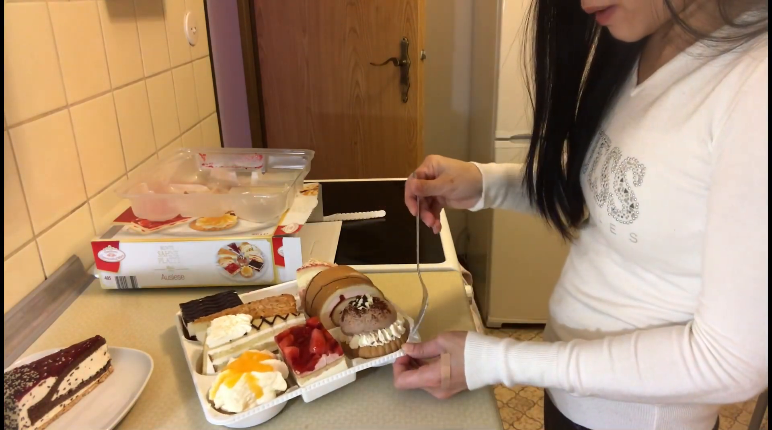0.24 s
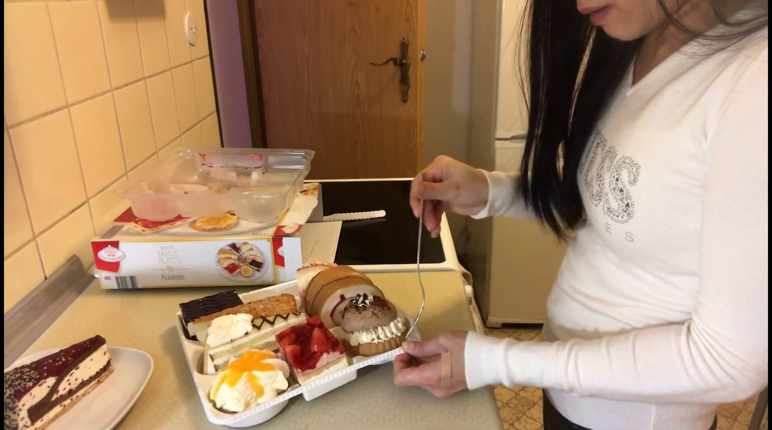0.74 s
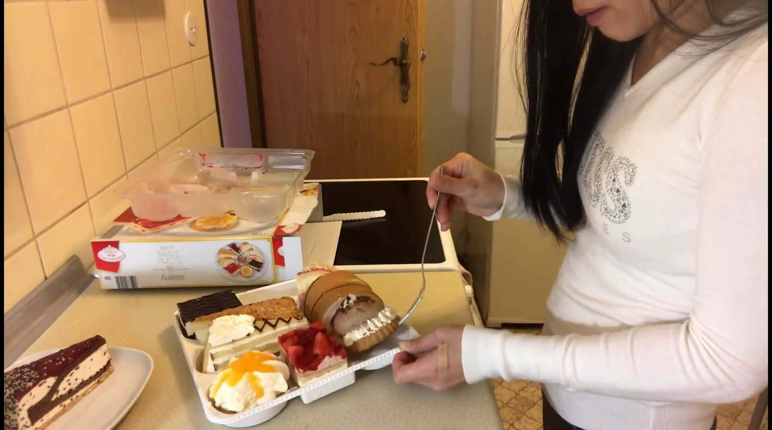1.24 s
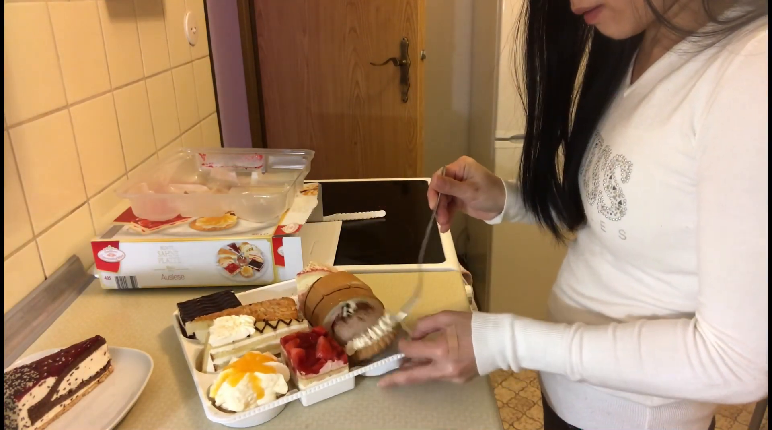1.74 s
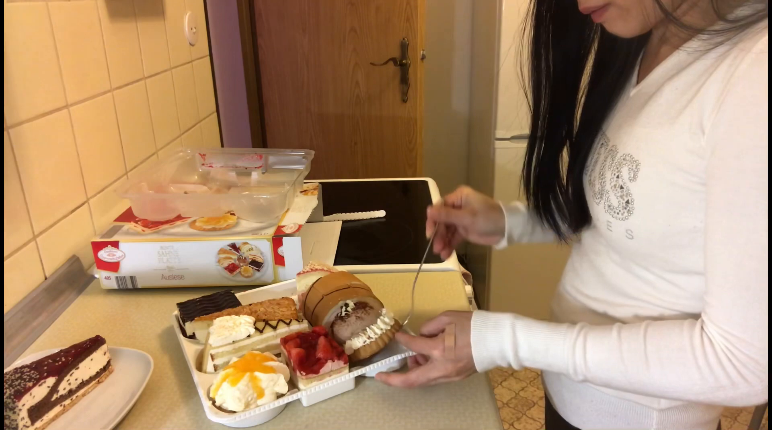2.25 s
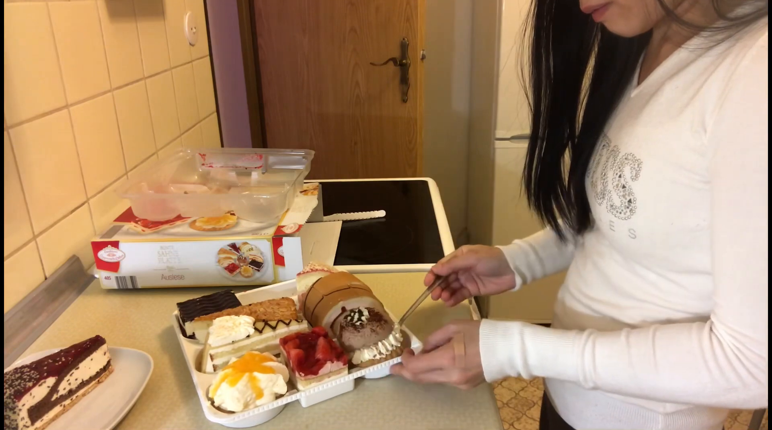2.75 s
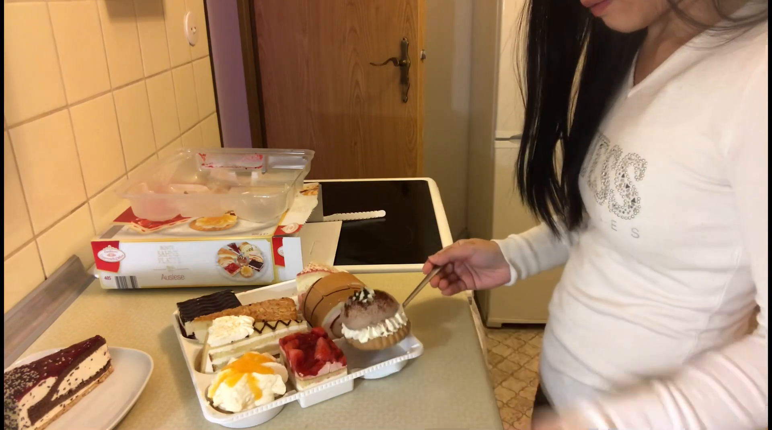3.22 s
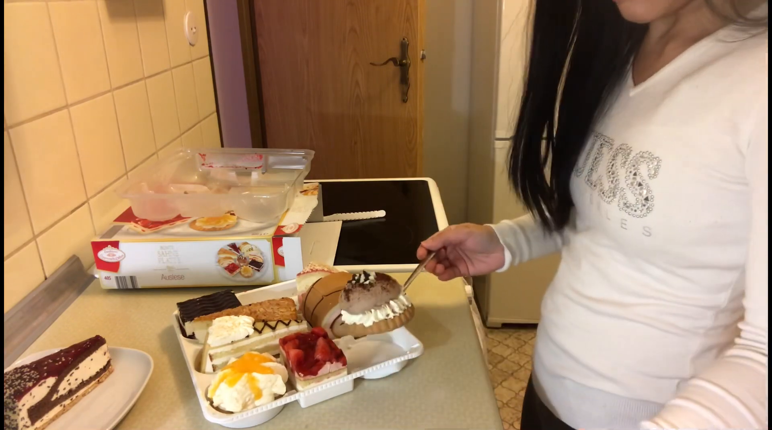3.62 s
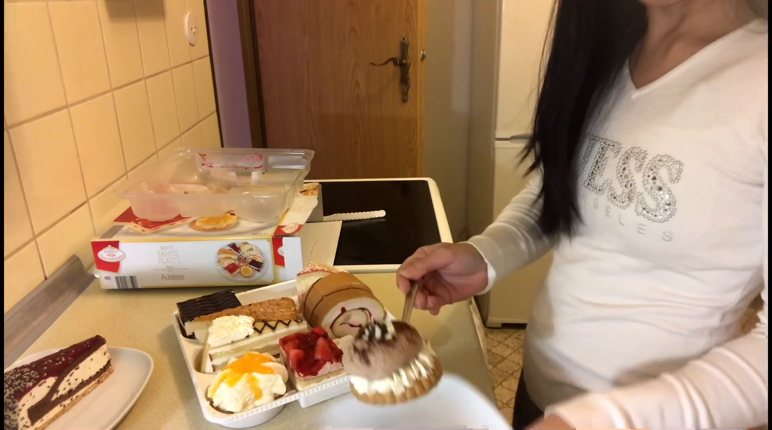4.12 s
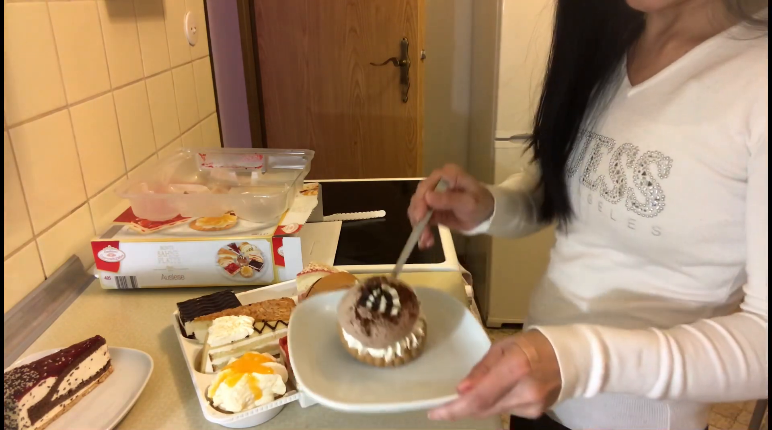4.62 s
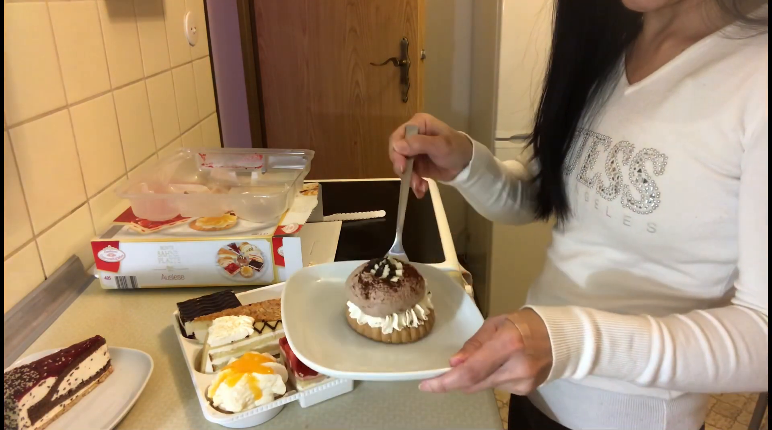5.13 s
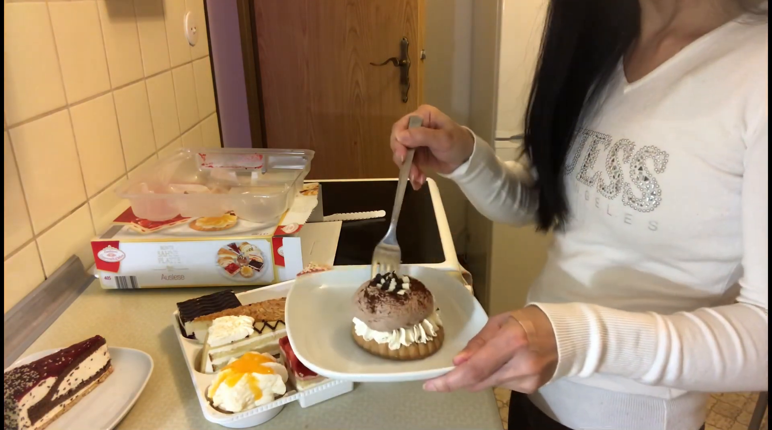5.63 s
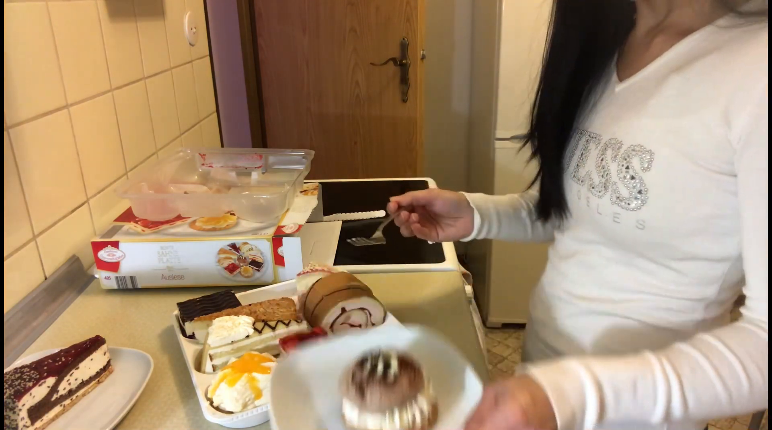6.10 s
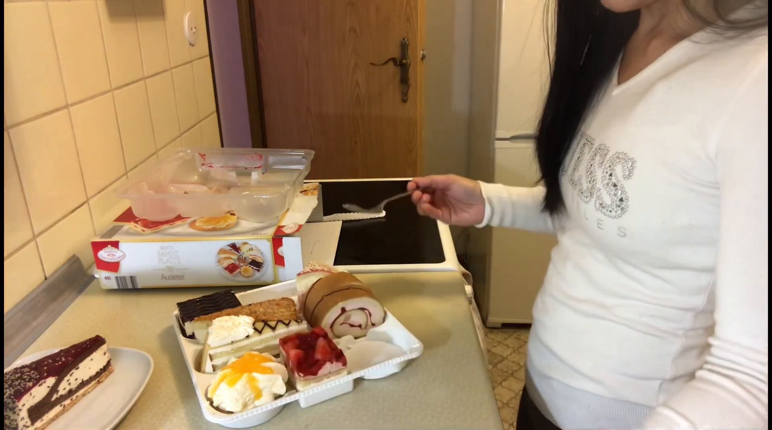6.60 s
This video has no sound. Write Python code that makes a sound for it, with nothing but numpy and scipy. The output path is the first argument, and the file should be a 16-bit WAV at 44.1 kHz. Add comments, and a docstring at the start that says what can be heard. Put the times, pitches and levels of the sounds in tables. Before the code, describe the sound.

A small tiled kitchen, heard by one close microphone: a low appliance hum and soft hiss run throughout, and contacts have a short bright echo. From 0 to 0.7 s a thin plastic tray taps, snaps at 0.27 and slides twice over the worktop, gritty and hissy. Around 1.1 it creaks faintly, then a cluster of dull knocks falls at 1.25. Light fork rubbing and soft taps continue, with a firmer tap at 2.27 and low tray wobbles until 3.3. A blunt bump comes at 3.6, then from 3.7 to 3.95 tines scrape out, crumbly then singing, over a plastic groan. At 4.24 the fork clinks brightly on china, bouncing at 4.28. A tiny, extremely high squeak follows at 4.87, then faint crumbly rubs and delicate ticks from 5.0 to 5.3. Near-quiet hum remains until 6.6, when the plate lands with a strong woody knock and two quick, weaker settling knocks.

```python
"""Cake is served in a small tiled kitchen, where an appliance hums and hisses throughout.
First a plastic tray taps, slides twice and creaks, while a steel fork rubs under a tartlet.
The tines drag out over the rim as the tray groans; the fork clinks on a china plate, squeaks and ticks.
At the end the plate is set down with a knock. Hits are short noise bursts and dying sine tones,
friction is filtered random clicks and noise, and most sounds get a short echo from the walls."""
import sys
import numpy as np
from scipy import signal
from scipy.fft import rfft, irfft, next_fast_len
from scipy.io import wavfile

SR = 44100
rng = np.random.default_rng(int(sys.argv[2]) if len(sys.argv) > 2 else 0)


def unload_audio(sound):
    """Save the sound as a 16-bit wav file, at the path given as the first command line argument."""
    columns = np.transpose(np.atleast_2d(sound))
    # keep every value between -1 and 1, then stretch to whole-number steps
    steps = np.round(np.clip(columns, -1, 1) * 32767)
    wavfile.write(sys.argv[1], SR, steps.astype(np.int16))


N = 302349  # length of the scene in samples


def amp(db):
    """Turn decibels into a gain."""
    return 10 ** (np.asarray(db) / 20)


def unit(x):
    """Scale a sound to an average (rms) strength of 1."""
    return x / np.sqrt(np.mean(x ** 2) + 1e-20)


def along(points, hz):
    """Read a curve of (Hz, value) points, with frequency on a log axis."""
    f, v = np.transpose(points)
    return np.interp(np.log(hz + 1), np.log(f + 1), v)


def seconds(size):
    """Make a time axis of so many samples."""
    return np.arange(size) / SR


def add(track, s, sound):
    """Lay a sound into the track at time s, in seconds."""
    start = max(0, round(s * SR))
    track[start:start + len(sound)] += sound[:max(0, N - start)]


def wobble(rate):
    """Draw a smooth random curve with this many random points a second."""
    points = rng.standard_normal(int(N * rate / SR) + 4)
    fine = signal.resample_poly(points, 8, 1)
    return np.interp(np.arange(N) * rate / SR, np.arange(len(fine)) / 8, fine)


def filtered(x, response):
    """Shape the spectrum of x by a response that depends on frequency."""
    size = 2 * next_fast_len(len(x) // 2 + 1024, real=True)
    hz = np.fft.rfftfreq(size, 1 / SR)
    return irfft(rfft(x, size) * response(hz), size)[:len(x)]


def band(hz, lo_hz, hi_hz):
    """Give the gain of a pass band with soft edges."""
    low_edge = 1 + (lo_hz / (hz + 1)) ** 6
    high_edge = 1 + (hz / hi_hz) ** 6
    return 1 / np.sqrt(low_edge * high_edge)


def causal(gain):
    """Give the minimum-phase response with this gain, so that a hit does not sound before its start."""
    cepstrum = irfft(np.log(np.maximum(gain, 1e-6)))
    cepstrum[1:len(cepstrum) // 2] *= 2
    cepstrum[len(cepstrum) // 2 + 1:] = 0
    return np.exp(rfft(cepstrum))


def blow(x):
    """Scale a hit to the energy of 3 ms at full level."""
    return x / np.sqrt(np.sum(x ** 2) / (.003 * SR))


def crack(spectrum, t60, sharp):
    """Make a contact: one push and a fast-dying noise of dense modes, in the body's colour."""
    t = seconds(SR // 10)
    scatter = blow(rng.standard_normal(len(t)) * amp(-60 * t / max(t60, .003)))
    push = blow(1. * (t == 0))
    coloured = filtered(scatter + sharp * push, lambda hz: causal(amp(along(spectrum, hz))))
    return np.pad(blow(coloured), (0, SR // 2 - len(t)))


def ring(modes, pitch, damping):
    """Sum the dying tones of a struck body, at new random strengths for each blow."""
    t = seconds(SR // 2)
    total = np.zeros(len(t))
    for hz, db, t60 in modes:
        strength_db = db + rng.normal(0, 3.4)
        decay = amp(strength_db - 60 * t * damping / t60)
        total += decay * rng.choice([-1, 1]) * np.sin(2 * np.pi * hz * pitch * t)
    return blow(total)


def tilt(x, lift_db, pivot_hz):
    """Brighten a hit by so many dB per octave, as harder contacts do; below zero dulls it."""
    return blow(filtered(x, lambda hz: causal(amp(lift_db * np.log2((hz + 200) / pivot_hz)))))


def in_room(x, wet_db):
    """Add the echo of the tiled walls: noise that builds up quickly and dies at its own rate per pitch."""
    # How long the echo lasts. Each row: frequency in Hz, time to fall by 60 dB in seconds.
    echo_times = [(100, 0.66), (500, 0.42), (2000, 0.46), (6000, 0.44), (14000, 0.34)]
    hz, t, noise = signal.stft(rng.standard_normal(SR // 2), SR, nperseg=256)
    decay = amp(-60 * t / along(echo_times, hz)[:, None])
    tail = signal.istft(noise * decay, SR, nperseg=256)[1]
    tail *= 1 - np.exp(-(seconds(len(tail)) / 0.0061) ** 2)
    return x + amp(wet_db) * signal.fftconvolve(x, tail / np.linalg.norm(tail))[:len(x)]


def slips(rate, smooth):
    """Make friction: tiny slips of uneven size, about rate a second, over a smooth rush."""
    clicks = unit((rng.random(N) < rate / SR) * rng.standard_normal(N))
    return unit(clicks + smooth * rng.standard_normal(N))


def stroke(s, attack_s, hold_s, release_db_per_s):
    """Give the gain of one push: it swells up to time s, holds and dies away."""
    t = seconds(N) - s
    swell = np.exp(-(np.minimum(t, 0) / attack_s) ** 2)
    return swell * amp(-release_db_per_s * np.maximum(t - hold_s, 0))


def background():
    """An appliance hums in steady, slightly drifting low tones over a soft even hiss of filtered noise."""
    # Tones of the hum. Each row: frequency in Hz, rms level in dB.
    hum_tones = [(48.4, -55.5), (96.9, -65.5), (145.3, -70.5), (193.8, -72.5), (242.2, -68), (344.5, -74),
                 (489.9, -84.5), (635.2, -73)]
    # Colour of the hiss. Each row: frequency in Hz, relative level in dB.
    air_colour = [(25, -29), (53, -7.5), (72, -22.5), (102, -20), (217, -25.5), (249, -17.5), (270, -22.5),
                  (641, -29), (754, -31), (1440, -31.5), (1890, -34.5), (8000, -42.5), (10500, -49),
                  (12500, -44.5), (16000, -45.5)]
    air_db = -62  # rms level of the hiss above 300 Hz
    t, drift_s = seconds(N), 0.00024 * wobble(5.3)
    hum = np.zeros(N)
    for hz, db in hum_tones:
        hum += amp(db) * np.sqrt(2) * np.sin(2 * np.pi * (hz * (t + drift_s) + rng.random()))
    air = filtered(rng.standard_normal(N), lambda hz: amp(along(air_colour, hz)))
    return hum + amp(air_db) * air / np.std(filtered(air, lambda hz: hz > 300))


def tray_rocks():
    """The loaded tray wobbles softly on its base after a push, each time as one low dying tone."""
    # Each row: start in seconds, level in dB before a lift of 2.5 dB, frequency in Hz.
    rocks = [(1.271, -52, 72), (1.759, -46, 75.4), (2.291, -37.5, 72.5), (2.816, -45.5, 79.6),
             (3.271, -49.5, 131.6), (3.85, -59, 148), (6.61, -38, 66.5)]
    t60_s = 0.33
    out, t = np.zeros(N), seconds(SR // 2)
    for s, db, hz in rocks:
        decay = amp(db + 2.5 - 60 * t / t60_s)
        soft_start = 1 - np.exp(-t / 0.008)
        add(out, s, decay * soft_start * np.sin(2 * np.pi * hz * t))
    return out


def tray_creak():
    """A tine sticks and slips on the plastic in a faint short note of wavering pitch."""
    swell = np.exp(-((seconds(N) - 1.105) / 0.048) ** 2)
    phase = 2 * np.pi * np.cumsum(930 * (1 + 0.012 * wobble(120))) / SR
    return in_room(amp(-56) * swell * np.sin(phase), wet_db=2)


def tray_taps():
    """Fork and fingers tap the thin plastic, which hardly rings; soft contacts thud, hard ones snap."""
    # Each row: start in seconds, level in dB before a cut of 2 dB, then low thud and
    # treble snap, both in dB against the tray's middle band before small offsets per pitch.
    taps = [(0.007, -40, -9, -38), (0.168, -49.5, -18, -2), (0.269, -31.5, -18, 26), (1.013, -41, -42, -36),
            (1.223, -38.5, 1, 3.5), (1.252, -23, -12, -21.5), (1.272, -35, -18, 20),
            (1.279, -26.5, -9.5, -1), (1.547, -51, -6, 9), (1.672, -40.5, 21, 8), (1.715, -45, -5, 4),
            (2.270, -25.5, -13, -7.5), (2.389, -36.5, -38, -3.5), (2.547, -50, -21, -1),
            (2.813, -38.5, 35, -8), (2.939, -47, -11, -19), (3.262, -45, -10, -7.5), (3.274, -41, 15, -10),
            (3.286, -49, -1, -5)]
    t60_s = 0.05
    fizz_db = -10.5  # extra cut of the top treble under the snap
    out = np.zeros(N)
    for s, db, thud_db, snap_db in taps:
        colour = [  # frequency in Hz, level in dB
            (50, thud_db - 14), (170, thud_db - 1.5), (600, 0.72 * thud_db - 0.5), (900, 0.3 * thud_db - 1),
            (1200, 1), (1850, -2.5),
            (3100, snap_db - 2.0), (5800, snap_db - 11.0),
            (9000, snap_db + fizz_db - 9.5), (15000, snap_db + fizz_db - 15.0)]
        tap = crack(colour, t60_s, sharp=0.6)
        add(out, s, amp(db - 2) * in_room(tap, wet_db=-6))
    return out


def tray_slide():
    """The tray is shoved over the worktop twice and coasts to rest; faster sliding hisses more."""
    # Each row: time of full speed in seconds, hold in seconds, level in dB.
    shoves = [(0.288, 0.087, -41.5), (0.534, 0.063, -41)]
    # Colour of the sliding tray. Each row: frequency in Hz, level in dB.
    slide_body = [(88, -34), (150, -7), (219, -11.5), (410, -4), (477, -9.5), (577, -1), (623, -9),
                  (685, -3.5), (782, -9.5), (928, -1.5), (1740, -0.5), (5850, -15), (14000, -38.5)]
    attack_s, coast_db_per_s = 0.016, 69
    hiss_db, hiss_growth = 14, 1.666  # hiss level where speed is 1; dB of hiss per dB of speed
    grit = filtered(slips(2500, smooth=1.0), lambda hz: amp(along(slide_body, hz)) * band(hz, 60, 8500))
    hiss = unit(filtered(slips(1600, smooth=1.0), lambda hz: band(hz, 3900, 5000)))
    pushes = [amp(db) * stroke(s, attack_s, hold_s, coast_db_per_s) for s, hold_s, db in shoves]
    speed = np.max(pushes, axis=0)
    return speed * unit(in_room(grit, wet_db=-10.5)) + amp(hiss_db) * speed ** hiss_growth * hiss


def worktop_knocks():
    """The tray bumps under the fork and drops back as the tartlet lifts off; last, the plate lands and settles."""
    # Blunt knocks. Each row: start in seconds, level in dB, pitch factor, treble lift in dB per octave,
    # clatter in dB, thud (bass lift of the clatter) in dB.
    knocks = [(1.2525, -29, 0.584, -1.5, 12, -9.5), (3.6237, -28.5, 0.5, 1.5, 11, -13),
              (6.601, -10, 0.97, 0.5, -5.5, -2.5), (6.633, -25, 0.99, -4, -5, 4.5),
              (6.6487, -18.5, 0.96, -2.5, -3.5, 0.5)]
    # Tones of the worktop and what lies on it. Each row: frequency in Hz before the pitch factor,
    # level in dB, time to fall by 60 dB in seconds before damping.
    worktop = [(124, -25, .14), (195.5, -29.5, 0.23), (256, -25, 0.098), (512, -15.5, 0.042),
               (590, -9, 0.031), (987, -12, 0.026), (1117, -4, 0.031), (1140, -1.5, 0.033),
               (1406, -3, 0.034), (2020, -13, 0.017), (3370, -22, 0.03), (5640, -31, 0.05),
               (7650, -50, .11)]
    # Colour of the clatter. Each row: frequency in Hz before the pitch factor, level in dB.
    clatter_colour = [(40, -27.5), (70, -10), (170, 0), (250, -6), (360, -8.5), (540, -3.5), (780, -5.5),
                      (1150, 3), (1400, -2), (1750, -8.5), (2400, -14), (3300, -22.5), (4900, -30.5),
                      (5400, -31), (6300, -37), (15000, -62)]
    out = np.zeros(N)
    for s, db, pitch, lift_db, clatter_db, thud_db in knocks:
        colour = [(hz * pitch, level_db + thud_db * band(hz, 0, 450)) for hz, level_db in clatter_colour]
        clatter = crack(colour, t60=0.044, sharp=1.0)
        hit = amp(-5.5) * ring(worktop, pitch, damping=1.07) + amp(clatter_db) * clatter
        add(out, s, amp(db) * in_room(tilt(hit, lift_db, pivot_hz=1000), wet_db=-8.0))
    return out


def fork_rub():
    """The fork drags on the tray, later on the plate, and pastry crumbles; bright strokes have more crumbs."""
    # Strokes through cake, over tray and plate. Each row: time of the peak in seconds, rise in seconds,
    # level of the scrape in dB, brightness in dB (less drag, more crumbs).
    rubs = [(1.11, 0.06, -71, -17), (1.2, 0.048, -57.5, -8.5), (1.44, 0.037, -66.5, -14),
            (1.665, 0.17, -56.5, 6.5), (2.42, 0.035, -50, -1.5), (2.70, 0.05, -64.5, 6),
            (2.81, 0.054, -60.5, -3.5), (2.96, 0.04, -74, -10), (3.46, 0.085, -67, 0),
            (4.65, 0.038, -60, 5.5), (5.04, 0.088, -63, 10.5), (5.305, 0.061, -65.5, 9)]
    drag = unit(filtered(slips(640, smooth=0.68), lambda hz: band(hz, 200, 1020)))
    scrape = unit(filtered(slips(900, smooth=.8), lambda hz: band(hz, 1370, 3300)))
    crumbs = unit(filtered(slips(1200, smooth=0.98), lambda hz: band(hz, 4000, 11000)))
    out = np.zeros(N)
    for s, rise_s, db, bright_db in rubs:
        mix = amp(-6.5 - bright_db) * drag + scrape + amp(-12.5 + bright_db) * crumbs
        out += amp(db) * stroke(s, rise_s, hold_s=0, release_db_per_s=210) * mix
    return in_room(out, wet_db=-5.5)


def tine_scrape():
    """The tines drag out over the rim: crumbs hiss, then rubbed steel sings while the plastic groans."""
    # Tones the steel favours. Each row: frequency in Hz, width in Hz, level in dB.
    tines = [(3420, 56, -3), (4140, 50, 0), (5550, 65, -4), (5800, 100, -2.5), (7850, 45, -1.5),
             (9030, 90, -8.5), (9480, 90, -10)]
    # Colour of the groaning plastic. Each row: frequency in Hz, level in dB.
    groan_colour = [(71, -34), (120, -6), (238, -2.5), (274, -15), (311, -3), (608, -4), (781, -14),
                    (1230, -6.5), (5000, -26), (6500, -55), (11000, -120)]
    start_s, hold_s, scrape_db = 3.725, 0.205, -59
    groan_start_s, groan_hold_s, groan_db = 3.815, 0.078, -48
    crumbs_first, crumbs_last = 0.79, 0.18  # share of crumbs at the start and end of the scrape

    def steel(hz):
        """Sum the resonances of the tines."""
        return sum(amp(db) * 1j * hz * width / (centre * centre - hz * hz + 1j * hz * width)
                   for centre, width, db in tines)

    song = unit(filtered(slips(550, smooth=.4), steel))
    crumbs = unit(filtered(slips(1500, smooth=.7), lambda hz: band(hz, 8000, 12500)))
    groan = unit(filtered(slips(700, smooth=.7), lambda hz: amp(along(groan_colour, hz))))
    share = np.interp(seconds(N), [start_s, start_s + hold_s], [crumbs_first, crumbs_last])
    flicker = amp(2 * wobble(40))
    scrape = (share * crumbs + np.sqrt(1 - share) * song) * flicker
    pull = amp(scrape_db) * stroke(start_s, 0.03, hold_s, release_db_per_s=700)
    bend = amp(groan_db) * stroke(groan_start_s, 0.046, groan_hold_s, release_db_per_s=250.5)
    return in_room(pull * scrape + bend * groan, wet_db=-7.5)


def fork_squeak():
    """Steel sticks and slips on the glaze: two faint chirps, then a shrill tone, with lower ones just after."""
    # Tones of the squeak. Each row: time of the peak in seconds, level in dB before an overall
    # cut of 14.5 dB, frequency in Hz, half-length in seconds.
    squeaks = [(4.646, -42, 2700, 0.0085), (4.838, -43, 2800, 0.014), (4.877, -20.5, 2902, 0.0046),
               (4.876, -35, 8450, 0.0047), (4.875, -29.5, 11220, 0.0087), (4.871, -4, 14005, 0.009)]
    t = seconds(N)
    wavering_time = np.cumsum(1 + 0.004 * wobble(400)) / SR  # makes all pitches waver together
    tone = np.zeros(N)
    for s, db, hz, length_s in squeaks:
        distance = np.minimum(np.abs(t - s) / length_s, 20)
        swell = np.exp(-distance ** 2) + 0.2 * np.exp(-distance)
        tone += amp(db) * swell * np.sin(2 * np.pi * hz * wavering_time)
    return in_room(amp(-14.5) * tone, wet_db=-11)


def plate_clinks():
    """The fork strikes the hand-held plate and bounces once; fainter, brighter ticks follow."""
    # Steel on china. Each row: start in seconds, level in dB, crack in dB,
    # treble lift in dB per octave, damping factor.
    clinks = [(4.219, -50, -13, 2, 0.83), (4.2418, -5.5, 5, 1, 2.3), (4.2805, -11.5, 3, 1.5, 2.3),
              (5.041, -45, -7, 4.5, 3.2), (5.1682, -41.5, -6, 6, 2.4), (5.309, -47.5, -11, 5.5, 1.7),
              (5.325, -54, -2, 5, 2.3)]
    # Tones of plate and fork together. Each row: frequency in Hz, level in dB,
    # time to fall by 60 dB in seconds before the damping factor.
    china = [(1030, -13, 0.08), (1450, -22, 0.52), (1820, -7.5, 0.18), (1900, -4, 0.22), (1959, -0.5, 0.19),
             (2038, -12, 0.9), (2560, -9, .15), (2570, -7, 0.18), (2520, -15, 0.16), (3048, -10, 0.071),
             (3300, -12.5, 0.2), (3456, -11, .24), (3532, -10.5, .2), (4270, -19, .18), (5190, -2, .19),
             (5250, -4.5, 0.17), (5400, -10, .3), (7150, -19, 0.08), (7550, -11.5, 0.14), (7830, -17, 0.33),
             (9610, -10, .13), (9700, -17.5, 0.21), (12800, -17.5, 0.2)]
    # Colour of the crack. Each row: frequency in Hz, level in dB.
    crack_colour = [(120, -68), (200, -44.5), (1000, -18.5), (1560, -20.5), (1940, 1), (2170, -13.5),
                    (2560, 0.5), (2800, -13), (3400, -12), (4200, -12.5), (4680, -20.5), (5330, -3.5),
                    (5840, -24.5), (7830, -15.5), (8900, -25), (13300, -28.5), (16000, -25)]
    out = np.zeros(N)
    for s, db, crack_db, lift_db, damping in clinks:
        tones = ring(china, pitch=1, damping=damping)
        hit = tones + amp(crack_db) * crack(crack_colour, t60=.03, sharp=0.33)
        add(out, s, amp(db) * in_room(tilt(hit, lift_db, pivot_hz=3000), wet_db=-9.0))
    return out


def scene():
    """Mix tray, fork and plate over the kitchen's hum, heard by one microphone."""
    tray = tray_taps() + tray_rocks() + tray_slide() + tray_creak()
    fork = fork_rub() + tine_scrape() + plate_clinks() + fork_squeak()
    return (tray + fork + worktop_knocks() + background())[None]


def record(dry):
    """The recorder clips at full scale, then drops the deepest bass and all above its band limit."""
    top_hz = 15850  # middle of the fade at the band limit

    def passed(hz):
        """Fade in from 25 to 43 Hz and out over 200 Hz at the top."""
        return np.clip((hz - 25) / 18, 0, 1) * np.clip((top_hz - hz) / 200 + .5, 0, 1)

    return np.array([filtered(np.clip(x, -1, 1), passed) for x in dry])


dry = scene()
out = record(dry)
unload_audio(out)
```